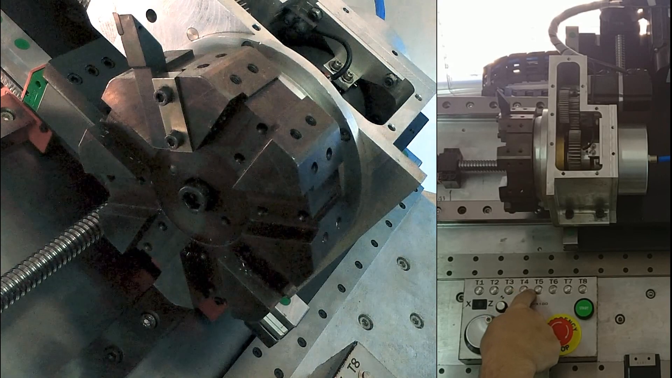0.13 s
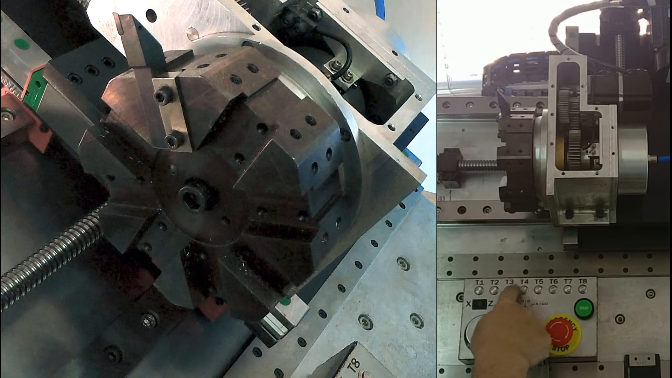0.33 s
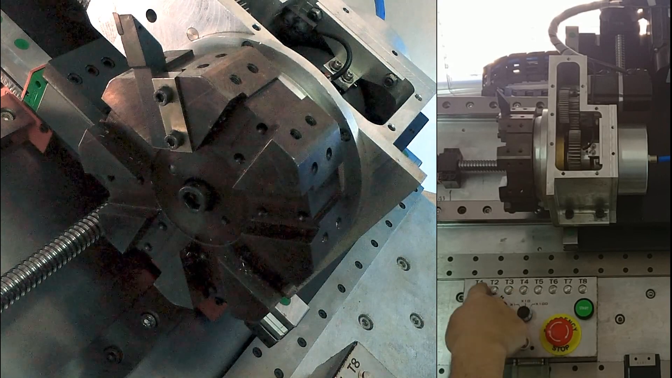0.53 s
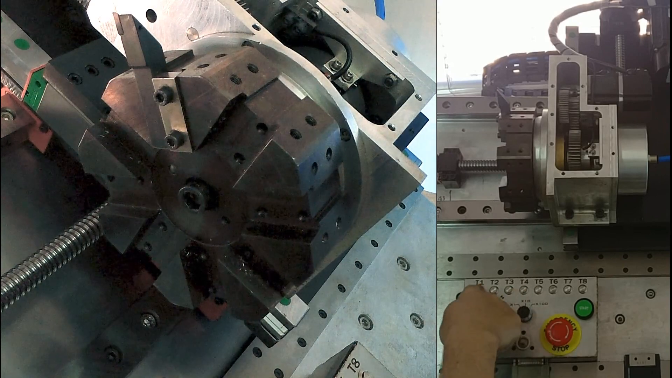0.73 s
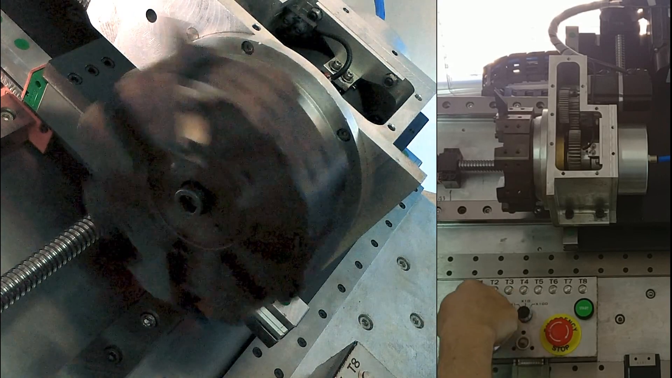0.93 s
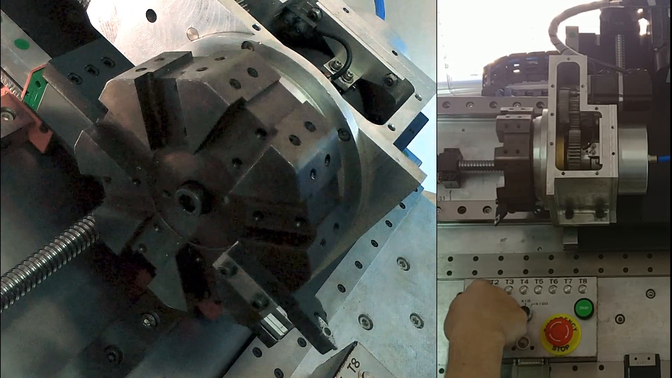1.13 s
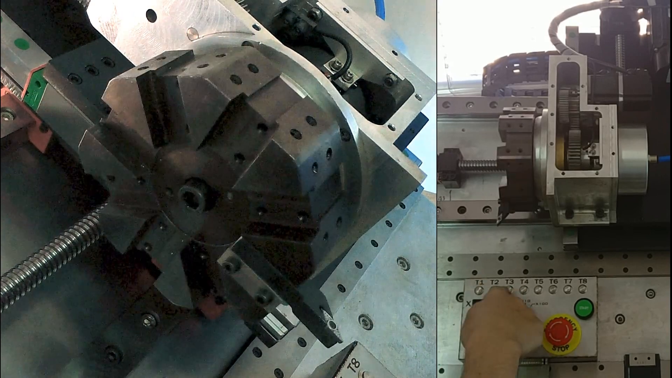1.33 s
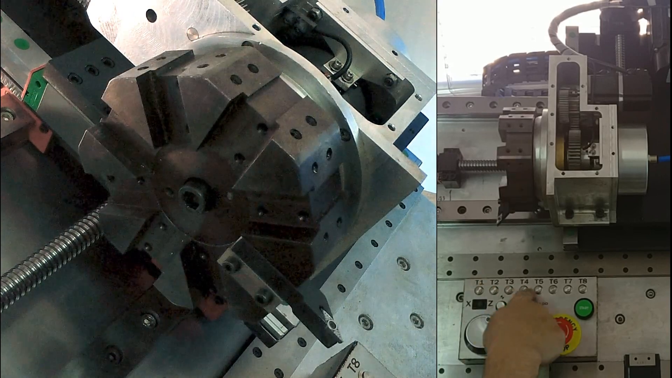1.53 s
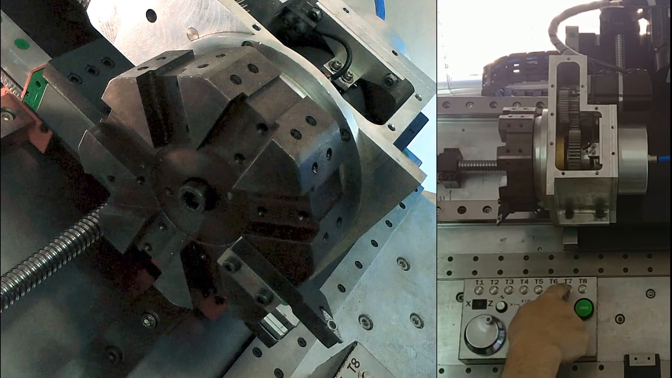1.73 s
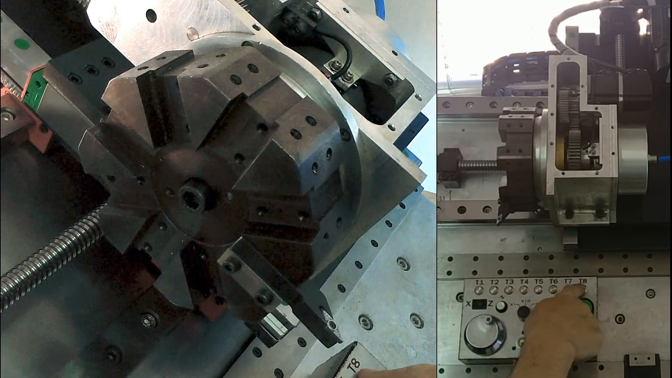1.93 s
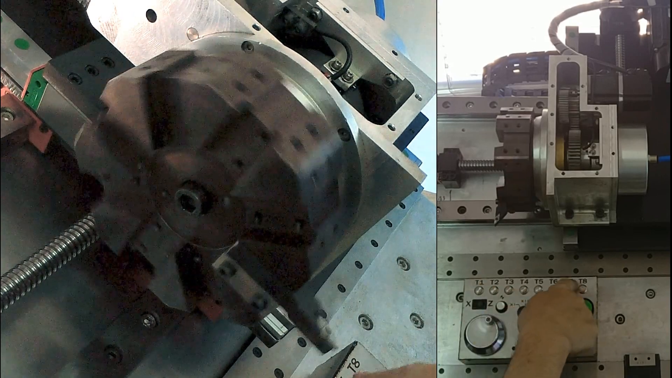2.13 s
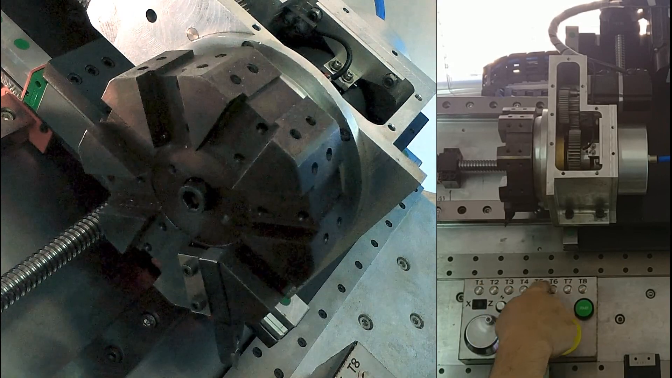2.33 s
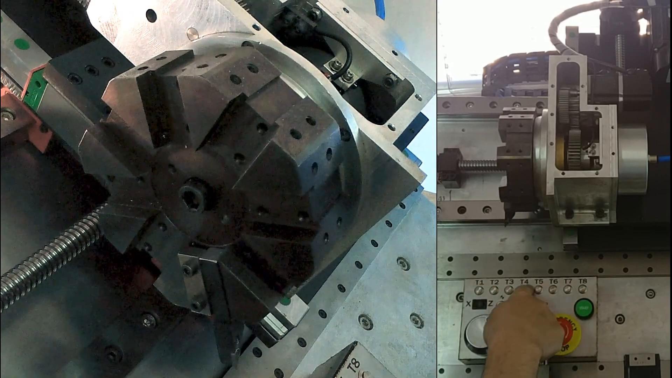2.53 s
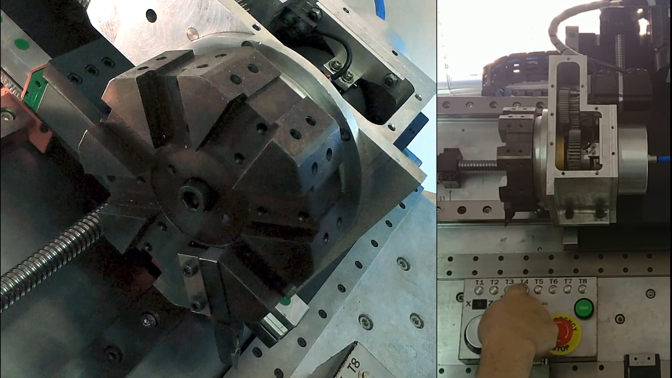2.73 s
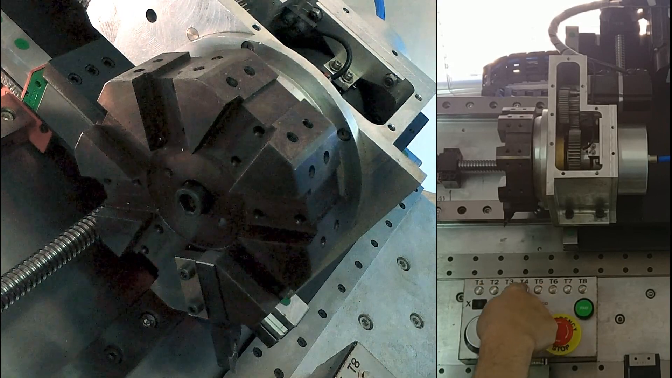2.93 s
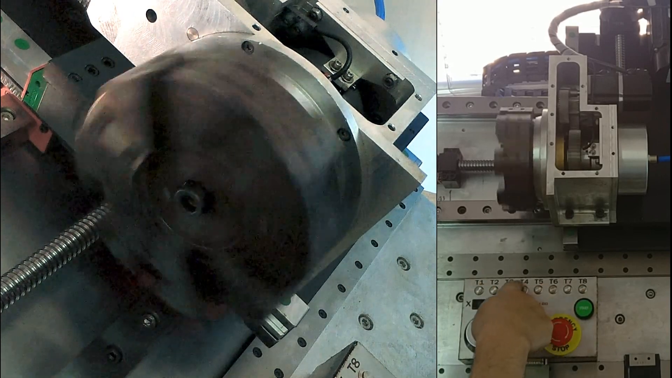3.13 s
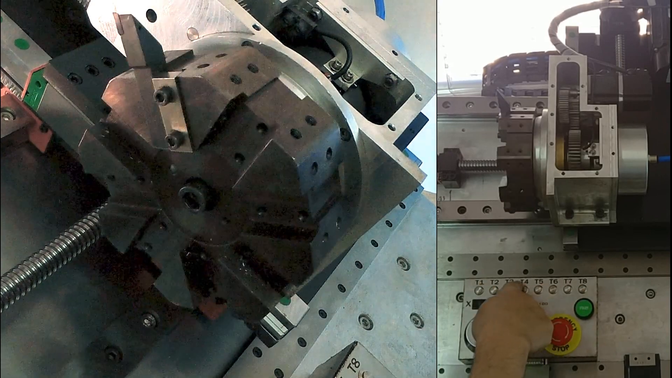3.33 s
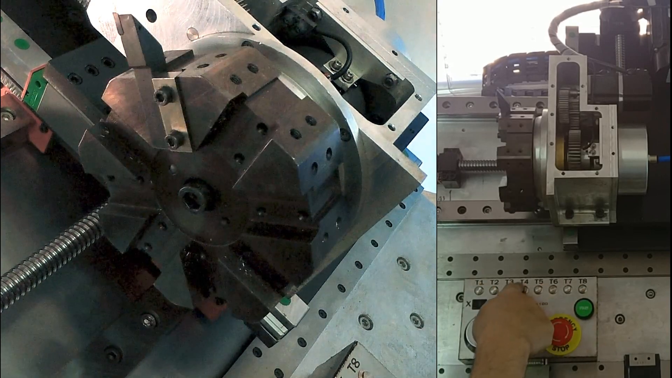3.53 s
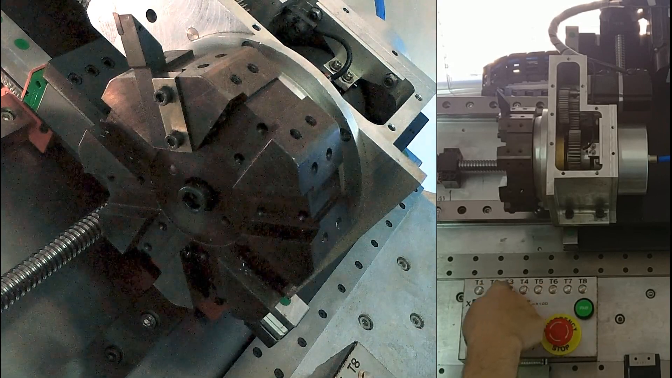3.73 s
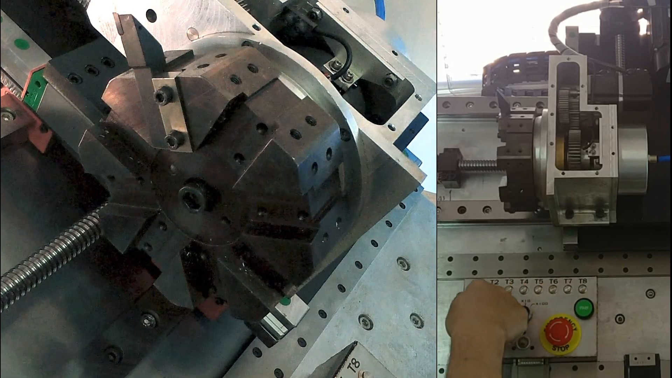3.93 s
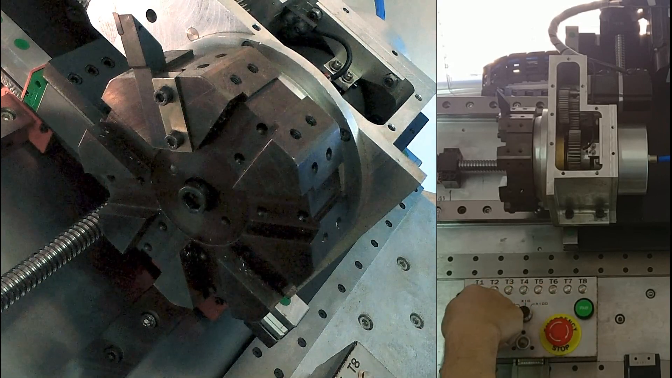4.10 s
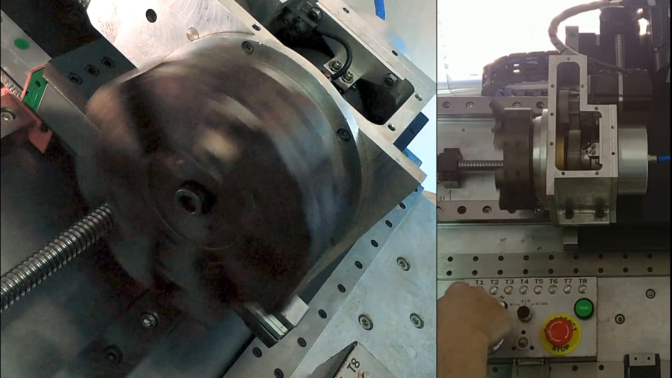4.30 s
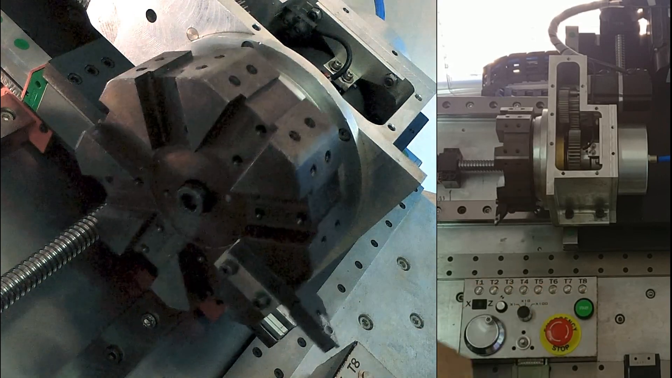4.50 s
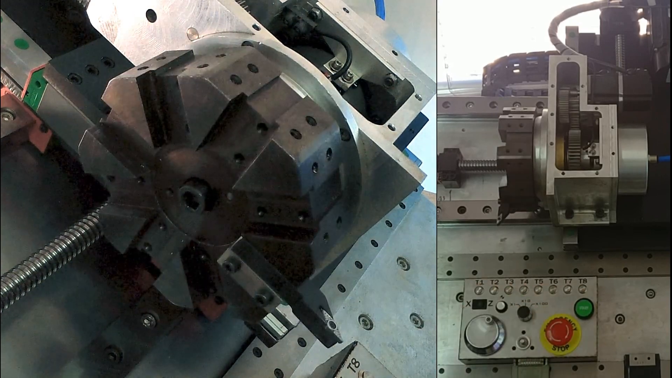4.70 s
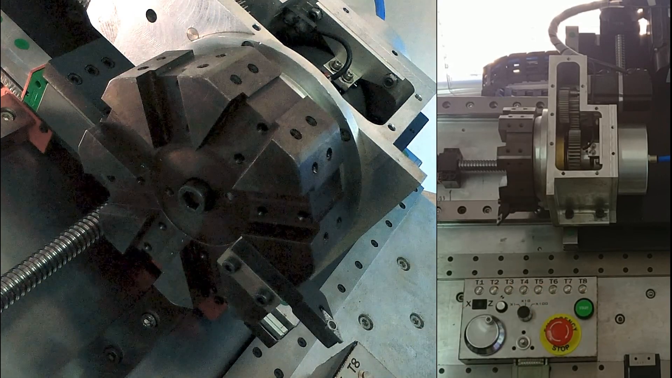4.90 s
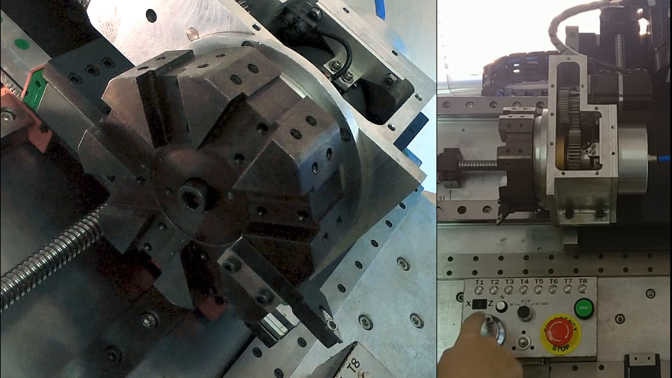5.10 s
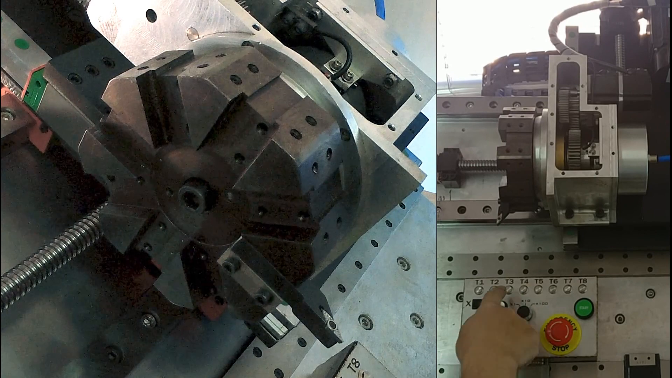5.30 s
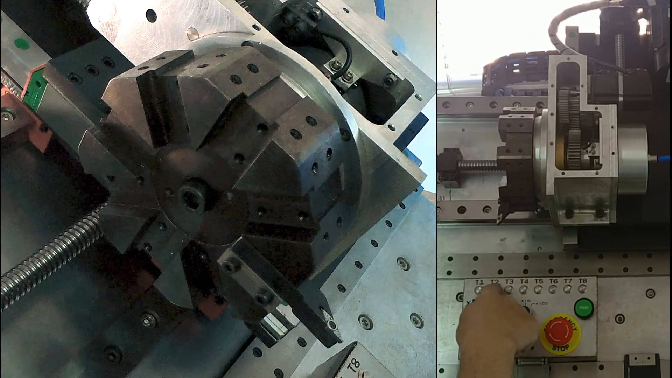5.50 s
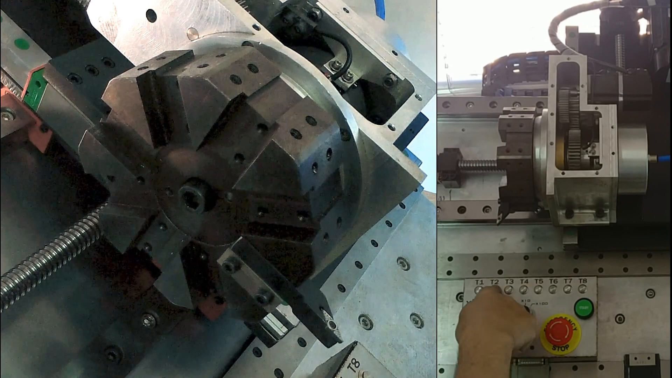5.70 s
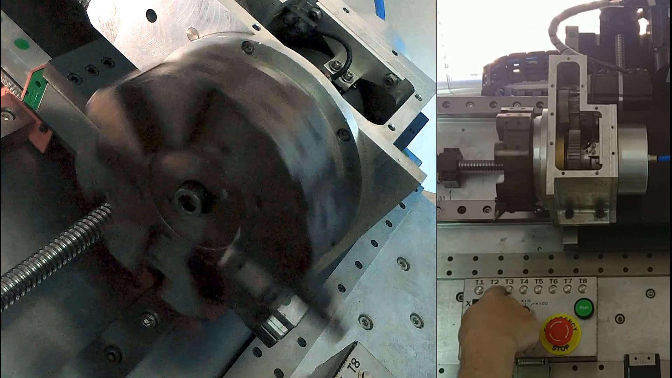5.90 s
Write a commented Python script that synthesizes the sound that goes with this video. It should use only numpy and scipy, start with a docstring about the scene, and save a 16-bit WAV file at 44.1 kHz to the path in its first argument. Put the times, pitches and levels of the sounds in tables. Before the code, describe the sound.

A pneumatic lathe turret indexes four times, each with a puff of air, a short metallic gear rattle and a hissing clunk.

```python
"""First comes a fading hiss of air: the pneumatic tool turret of a small lathe has just clamped.
Close to a stereo microphone in a workshop, it indexes four times and starts a fifth. Most cycles
open with a button click; a puff of air unclamps the turret, gear teeth rattle its body round,
and the clamp valve snaps and vents. The bench rocks under the jolts and the frame thuds.
Behind the machine, cabinet fans hum and servo drives whistle faintly."""
import sys
import numpy as np
from scipy import signal
from scipy.fft import rfft, irfft, next_fast_len
from scipy.io import wavfile

SR = 44100
rng = np.random.default_rng(int(sys.argv[2]) if len(sys.argv) > 2 else 0)


def transcribe(u):
    """Save the signal u as a 16-bit wav file named by the first command-line argument.

    u: samples, shape (n,) or (channels, n), limited to [-1, 1]; the rate is SR.
    q: integer samples, one column per channel.
    """
    v = np.clip(np.atleast_2d(u).T, -1, 1)
    q = np.round(v * 32767).astype(np.int16)
    wavfile.write(sys.argv[1], SR, q)


N = 262394

# valve shifts: (time [s], rise [s], blast level [dB], bleed over blast [dB], left over right [dB],
# top treble boost [dB], piston landing level [dB])
UNCLAMPS = [(0.8928, 0.0058, -10.5, -6.5, -2, 3, -14.5), (2.1163, 0.0049, -14, -4.5, -2.5, 8, -11),
            (2.9685, 0.0063, -9.5, -7.5, -1, 5.5, -13), (4.203, 0.013, -15.5, -2.5, -1, 4.5, -13),
            (5.8346, 0.0092, -6, -10, -4.5, 5, -14)]
CLAMPS = [(-.07, .0006, -10, -2.5, -1.3, 5, -11), (1.2573, 0.00054, -10, -3.5, 0.24, 2.7, -13.5),
          (2.3764, 0.00035, -11, -2, -0.42, 6.6, -18), (3.3727, 0.00053, -11, -2.5, -0.81, 8.9, -17.5),
          (4.5696, 0.00042, -9.5, -3.5, -1.8, 4.8, -14.5)]
# spectra of the exhaust, close up: (frequency [Hz], relative level [dB])
BLAST_COLOUR = [(88, -19.5), (150, -1.5), (1060, -13.5), (3060, -2), (3720, -18.5), (4100, 2),
                (4520, -22.5), (4890, -3.5), (6690, 0.5), (8630, 3.5), (9510, -3.5), (10500, 3),
                (13800, -9), (14900, -1), (16100, -11.5)]
BLEED_COLOUR = [(880, -10.5), (1640, -9), (2500, -11.5), (2980, -8), (3630, -11), (9070, 4), (11800, 0.5),
                (13900, -8), (15100, -6), (16100, -16)]
# valve body resonances in the blast, nozzle whistles in the bleed: (frequency [Hz], width [Hz], boost [dB])
VALVE_PEAKS = [(4853, 140, 8.5), (6100, 300, 5), (7900, 180, 2.5), (8640, 300, 7), (10200, 150, 8),
               (11060, 150, 6), (12250, 200, 8.5), (13100, 250, 8), (15300, 200, 6)]
NOZZLE_PEAKS = [(7310, 25, -24.5), (8000, 71, -12), (10000, 31, 6), (11300, 17, 9), (13000, 120, 7.5),
                (15580, 55, 12)]
# the air sits mostly left of the microphone: (frequency [Hz], left over right [dB])
AIR_PAN = [(60, 1), (150, 5.5), (380, 4), (950, 14), (2380, 3), (5980, 6.5), (15000, -3)]
# its stereo image: (frequency [Hz], left-right coherence [ratio])
AIR_COHERENCE = [(60, 0.74), (240, 0.41), (950, 0.24), (3770, -0.13), (15000, 0.2)]
# venting: (blast length [s], blast t60 [s], bleed t60 [s], empty after [s], leak lead [s],
# leak over blast [dB])
UNCLAMP_VENT = (0.0176, 0.0458, 0.3967, .3, 0.0164, -32.5)
CLAMP_VENT = (0.0208, 0.1792, 0.5849, 0.28, 0.0151, -16)
RUN_DRY_DB_PER_S = 148


def air():
    """Each valve leaks, blasts until it is emptied, then the line bleeds down and runs dry."""
    t = np.arange(N) / SR
    blast, sizzle, bleed = np.zeros((3, 2, N))
    for shifts, vent in ((UNCLAMPS, UNCLAMP_VENT), (CLAMPS, CLAMP_VENT)):
        length, t60, bleed_t60, empty, leak, leak_db = vent
        for s, rise, db, bleed_db, pan_db, top_db, _ in shifts:
            age = np.maximum(t - s, 0)
            opening = np.minimum(age / rise, 1) ** 2 * gain_of([[db + pan_db / 2], [db - pan_db / 2]])
            opening += gain_of(db + leak_db) * np.clip((t - s) / leak + 1, 0, 1) * (age < rise)
            jet = opening * gain_of(-60 * np.maximum(age - length, 0) / t60)
            blast += jet
            sizzle += jet * (gain_of(top_db) - 1)
            run_dry_db = RUN_DRY_DB_PER_S * np.maximum(age - empty, 0)
            bleed += opening * gain_of(bleed_db - 60 * age / bleed_t60 - run_dry_db)
    roar = unit_rms(hiss(BLAST_COLOUR, AIR_COHERENCE, AIR_PAN, VALVE_PEAKS) * flicker(db=1.7, hz=1200))
    top = signal.sosfiltfilt(signal.butter(2, 10500, "high", fs=SR, output="sos"), roar)
    nozzle = hiss(BLEED_COLOUR, AIR_COHERENCE, AIR_PAN, NOZZLE_PEAKS)
    return (blast * roar + sizzle * top + bleed * nozzle) * flicker(db=1.22, hz=150)


def valves():
    """A pressure pulse snaps as each clamp valve shifts; each unclamp spool seats with a bright ping."""
    seat_delay_s, seat_hz = 0.016, 11400
    out = np.zeros(N)
    age = np.arange(400) / SR / 0.00019  # in time constants of the pulse
    pulse = (1 - age) * np.exp(-age) * np.minimum(age / 0.77, 1)
    for s, *_ in CLAMPS:
        add(out, s, gain_of(6.5) * pulse)
    ping = np.sin(2 * np.pi * seat_hz * np.arange(SR // 2) / SR)
    for s, _, blast_db, *_ in UNCLAMPS:
        add(out, s + seat_delay_s, dying(blast_db + 3.5, t60=0.0068, rise=0.0003) * ping)
    return out


# modes of the turret body: (frequency [Hz], width [Hz], relative level [dB])
TURRET_MODES = [(348, 30, -5), (396, 21, 1.5), (447.8, 20.5, 4), (489, 42, 4), (500.3, 32, 3),
                (583, 37, 6.5), (697, 63, 6.5), (801, 28, 2), (964, 6.1, -4.5), (1068, 26, -3),
                (1110, 48, 7.5), (1254.6, 19.5, 5.5), (1236, 20, -0.5), (1295, 30, -3)]
# sliding faces: (frequency [Hz], relative level [dB])
GRIT_COLOUR = [(880, -23), (1500, -27), (1720, 4), (1890, 1.5), (2520, 3), (3260, -4.5), (4900, -6.5),
               (5900, -9.5), (6860, -28), (7890, -12.5), (11600, -12.5), (16100, -24)]
# ringing tool holders and a thin squeal on the grit: (frequency [Hz], width [Hz], boost [dB])
HOLDER_PEAKS = [(1654, 20, 15), (2437, 57, 8), (3070, 38, 10), (3620, 99, 7.5), (4640, 150, 9)]
SQUEAL_PEAK = [(15690, 50, 22)]
# the turret's image at the microphone: (frequency [Hz], left-right coherence [ratio])
TURRET_COHERENCE = [(60, 0.37), (240, 0.2), (950, 0.74), (3770, 0.13), (15000, 0.2)]
TEETH_PER_S, UPPER_MODES_FROM_HZ = 300, 950


def turret():
    """Uneven gear teeth and knocks rattle the modes of the turret body; its sliding faces add grit."""
    drive = turret_drive() * flicker(db=1.0, hz=122)
    strikes = gain_of(4 * rng.exponential(1, N)) * (rng.random(N) < TEETH_PER_S / SR)
    teeth = signal.oaconvolve(strikes, dying(0, t60=0.012, rise=0.00036)[:1000])[:N]
    lower, upper, grit = drive * unit_rms(1 + 0.22 * unit_rms(teeth))
    low_blows, high_blows, shaken_grit = gear_knocks()
    rattle = hiss(FLAT, TURRET_COHERENCE)
    body = np.zeros((2, N))
    for k, (hz, width, db) in enumerate(TURRET_MODES):
        effort, blows = (lower, low_blows) if hz < UPPER_MODES_FROM_HZ else (upper, high_blows)
        makeup = np.sqrt(SR / width / np.pi)  # narrow modes catch less of the rattle
        body += gain_of(db - 13.5) * makeup * resonate(rattle * effort + blows * (-1) ** k, hz, width)
    # the body is too small to radiate bass
    body = signal.sosfilt(signal.butter(3, 330, "high", fs=SR, output="sos"), body)
    scrape = hiss(GRIT_COLOUR, TURRET_COHERENCE, peaks=HOLDER_PEAKS + SQUEAL_PEAK)
    return body + (grit + shaken_grit) * scrape * flicker(db=1.0, hz=410)


# gear rattle, one list a turn: (time [s], lower modes [dB], upper over lower [dB], grit over lower [dB])
TURNS = [
    [(1.0, -45, -2, -35), (1.042, -23.5, 0, -15), (1.092, -13.5, 0, -4), (1.112, -25.5, 1, -3.5),
     (1.166, -16.5, -5, -8.5), (1.232, -34.5, -27, -50), (1.25, -33, -13, -21)],
    [(2.225, -48, 13, 8), (2.241, -42, -10, -15), (2.259, -33.5, 16, 2), (2.283, -24.5, 0, -2),
     (2.307, -19, -3, -4), (2.319, -25, -16, -8), (2.349, -40, 1, -3), (2.37, -37, -2, -8)],
    [(3.08, -51.5, 9.5, 4), (3.13, -18.5, 2, -11.5), (3.172, -16, -3, -5.5), (3.21, -27.5, 3.5, -0.5),
     (3.226, -15, 4, -3.5), (3.268, -23, -5, 1.5), (3.28, -14.5, -9, -23.5), (3.296, -24, 0.5, -43),
     (3.318, -25.5, -13, -15), (3.365, -43, -2, -12.5)],
    [(4.315, -47, -2, -5.5), (4.353, -26.5, 5.5, -7), (4.405, -13.5, -6.5, -6.5), (4.443, -24, -1, -2),
     (4.483, -19, 0, -6.5), (4.505, -30, 1, -9.5), (4.533, -29.5, -14.5, -18.5), (4.56, -41, -11, -9)],
]
# knocks as a piston lands: (delay [s], level over landing [dB], rise [s], t60 [s],
# upper over lower [dB], grit over lower [dB])
UNCLAMP_KNOCKS = [(0, -22, 0.0026, 0.12, -18, 1.5), (0.043, -22.5, 0.002, 0.089, -0.5, -4.5)]
CLAMP_KNOCKS = [(-0.0033, -11, 0.0069, 0.35, -7.5, -10)]


def turret_drive():
    """How hard turns and piston knocks drive the lower modes, upper modes and sliding faces."""
    t, drive = np.arange(N) / SR, np.zeros((3, N))
    for turn in TURNS:
        s, db, upper_db, grit_db = np.transpose(turn)
        turning = (t > s[0]) * (t < s[-1])
        drive += [gain_of(np.interp(t, s, db + over_db)) * turning for over_db in (0, upper_db, grit_db)]
    for s, db, knocks in landings(UNCLAMP_KNOCKS, CLAMP_KNOCKS):
        for delay, knock_db, rise, t60, upper_db, grit_db in knocks:
            add(drive, s + delay, gain_of([[0], [upper_db], [grit_db]]) * dying(db + knock_db, t60, rise))
    return drive


def landings(on_unclamp, on_clamp):
    """Each piston hits its stop just after its valve shifts: (time [s], level [dB], what it sets off)."""
    unclamp_travel_s, clamp_travel_s = 0.032, 0.031
    return ([(s + unclamp_travel_s, db, on_unclamp) for s, *_, db in UNCLAMPS]
            + [(s + clamp_travel_s, db, on_clamp) for s, *_, db in CLAMPS])


# the hardest gear knocks of the turns: (time [s], level [dB], upper over lower modes [dB])
GEAR_KNOCKS = [(1.063, 6, 5), (1.085, 8, -1), (1.094, 8, 1), (1.139, 6, -3), (1.162, 4, 1), (2.260, -4, 2),
               (2.292, 4.5, 1), (2.306, 5, -2), (3.119, 3, 7), (3.165, 10.5, 5), (3.174, 7, 0),
               (3.2185, 11, 5), (3.240, 7, 2), (3.274, 8.5, -4), (4.374, 2, 6), (4.393, 8, 0),
               (4.407, 7, -1), (4.480, 3, 1)]


def gear_knocks():
    """Single blows to the lower and upper modes, and the burst of grit that each one shakes loose."""
    blows, grit = np.zeros((2, N)), np.zeros(N)
    for s, db, upper_db in GEAR_KNOCKS:
        add(blows, s, gain_of([[db], [db + upper_db]]))
        add(grit, s, dying(db - 30, t60=0.031, rise=0.0005))
    return *blows, grit


# modes of the bench under the lathe: (frequency [Hz], relative level [dB], t60 [s],
# left over right [dB], left phase lead [rad])
BENCH_MODES = [(70.2, -3.5, 0.63, -9, 2.4), (96.4, 4.5, 0.3, -5, 0.89), (195.4, -0.5, 0.42, 6.5, 0.52),
               (257.6, -15, 0.46, 20.5, 1.1), (311, -8, 0.43, 4, 0.78)]
# jolts of the drive during a turn: (time [s], level [dB], frequency [Hz])
JOLTS = [(1.09, -22.5, 146), (1.143, -25, 119), (1.197, -22, 120.6), (2.27, -21.5, 121),
         (2.349, -29.5, 129), (3.169, -21.5, 140), (3.219, -22, 144), (3.27, -23, 144), (4.355, -22.5, 126),
         (4.409, -22.5, 138), (4.455, -25.5, 132), (4.519, -28.5, 101)]
# swings of the bench after a landing: (level over landing [dB], frequency [Hz])
UNCLAMP_SWINGS = [(-6.5, 127), (-6.5, 124)]
CLAMP_SWINGS = [(-11.5, 132), (-13.5, 139.3), (-18.5, 136.6), (-25, 130)]
# when each swing starts: (delay after landing [s])
UNCLAMP_DELAYS = (0, .074)
CLAMP_DELAYS = (0, .045, .135, .225)


def bench():
    """The bench rocks on a low note at every jolt, and rings and rocks back when a piston lands."""
    t = np.arange(SR) / SR
    rocking, ringing = np.zeros((2, 2, N))
    ring = np.zeros((2, SR))
    for hz, db, t60, pan_db, lead in BENCH_MODES:
        decay = gain_of(db - 17 - 60 * t / t60 + np.array([[pan_db], [-pan_db]]) / 2)
        ring += decay * np.sin(2 * np.pi * hz * t + [[lead], [0]])
    jolts = list(JOLTS)
    for s, db, rock in landings((UNCLAMP_DELAYS, UNCLAMP_SWINGS), (CLAMP_DELAYS, CLAMP_SWINGS)):
        add(ringing, s, gain_of(db) * ring * np.minimum(t / 0.0025, 1))
        for delay, (swing_db, hz) in zip(*rock):
            jolts.append((s + delay, db + swing_db, hz * rng.normal(1, 0.04)))
    for s, db, hz in jolts:
        note = np.sin(2 * np.pi * hz * t[:SR // 2] + [[0.9], [0]])
        add(rocking, s, dying(db, t60=0.18, rise=0.019) * note)
    return rocking * gain_of([[-1.5], [2.2]]) + ringing


# low thuds, a little left of the microphone: (time [s], level [dB], starting frequency [Hz])
THUDS = [(-.03, -30.5, 230), (1.295, -23.5, 207), (1.33, -28.5, 250), (2.405, -26, 203),
         (2.448, -25.5, 250), (3.01, -27.5, 205), (3.42, -31.5, 203)]
# modes of the frame: (frequency [Hz], level over thud [dB], t60 [s])
FRAME_MODES = [(220, -12.5, 1.0), (241, -16.5, 0.86)]


def thuds():
    """The turret settles on its coupling: each thud sags in pitch and leaves the frame ringing."""
    sag_per_s, rise_s = 3.8, 0.014
    t, out = np.arange(SR // 2) / SR, np.zeros(N)
    ring = sum(dying(db, t60, rise_s) * np.sin(2 * np.pi * hz * t) for hz, db, t60 in FRAME_MODES)
    for s, db, hz in THUDS:
        sagging = np.sin(2 * np.pi * hz * (1 - np.exp(-sag_per_s * t)) / sag_per_s)
        add(out, s, gain_of(db) * (dying(0, t60=0.13, rise=rise_s) * sagging + ring))
    return out * gain_of([[1.5], [-1.5]])


# button presses at the machine: (time [s], relative level [dB], t60 [s])
CLICKS = [(0.7971, -31.5, 0.091), (2.005, -45.5, 0.13), (4.1157, -49.5, 0.11), (5.746, -45, 0.092)]
# their spectrum: (frequency [Hz], relative level [dB])
CLICK_COLOUR = [(1470, -28), (2500, -8), (2990, -55), (4110, -4), (5690, -14), (6760, -8), (9220, 4),
                (16000, -16)]


def button():
    """The push button gives a small bright click with a short rattle."""
    envelope = np.zeros(N)
    for s, db, t60 in CLICKS:
        add(envelope, s, dying(db + 0.5, t60, rise=0.00043))
    return envelope * hiss(CLICK_COLOUR, SHOP_COHERENCE)


# room tone of the workshop: (frequency [Hz], relative level [dB])
SHOP_COLOUR = [(15, -57.5), (25, -45), (49, -6.5), (212, -12), (271, -14), (562, -8.5), (644, -10),
               (844, -6.5), (941, -10), (1410, -18.5), (1620, -12), (2360, -11.5), (3710, -27.5),
               (4770, -29), (9300, -27.5), (10300, -24), (11400, -32.5), (16100, -50)]
# a broad hump in its treble: (frequency [Hz], width [Hz], boost [dB])
SHOP_HUMP = [(7960, 880, 5)]
# the room's image at the microphone: (frequency [Hz], left-right coherence [ratio])
SHOP_COHERENCE = [(60, 0.38), (150, 0.2), (380, 0.76), (950, 0.4), (2380, 0.019), (5980, 0.06),
                  (15000, 0.98)]


def room_tone():
    """A steady wash of workshop noise around the microphone."""
    return gain_of(-47.5) * hiss(SHOP_COLOUR, SHOP_COHERENCE, peaks=SHOP_HUMP)


# cabinet fans, centred in the background: (frequency [Hz], width [Hz], level [dB])
FAN_TONES = [(685, 4.1, -59), (841, 13, -56), (1340, 7.2, -66)]


def fans():
    """Each fan hums a steady tone, blurred by a narrow band of noise."""
    t, out = np.arange(N) / SR, np.zeros(N)
    for hz, width, db in FAN_TONES:
        fuzz = unit_rms(resonate(rng.standard_normal(N), hz, width))
        out += gain_of(db) * unit_rms(fuzz + 1.8 * np.sin(2 * np.pi * hz * t))
    return out


# whistling while the turret rests: (start [s], end [s], low note level [dB], high note level [dB])
SERVO_RESTS = [(0, 0.9, -65.5, -78), (1.25, 2.12, -82, -69), (2.38, 2.975, -67, -78),
               (3.37, 4.21, -74.5, -69), (4.57, 5.84, -73, -74)]
# the low and the high note: (frequency [Hz])
SERVO_HZ = np.array([[8000], [10002]])


def servos():
    """The drives whistle on two notes, their strength set by where the turret rests."""
    t = np.arange(N) / SR
    levels = sum((t > start) * (t < end) * gain_of([[low_db], [high_db]])
                 for start, end, low_db, high_db in SERVO_RESTS)
    notes = np.sqrt(2) * np.sin(2 * np.pi * SERVO_HZ * t)
    return (levels * notes).sum(axis=0) * flicker(db=1.5, hz=8)


def reflections(x, t60):
    """The workshop returns sparse, dying echoes of random sign, different in each channel."""
    taps = np.zeros((2, SR // 2))
    at = np.arange(300, SR // 2 - 20, 20) + rng.integers(0, 20, (2, (SR // 2 - 301) // 20))
    np.put_along_axis(taps, at, rng.choice([-1., 1.], at.shape), 1)
    taps *= gain_of(-60 * np.arange(SR // 2) / SR / t60)
    return signal.fftconvolve(x, taps / np.linalg.norm(taps[0]), axes=1)[:, :N]


FLAT = ((20, 0), (20000, 0))  # an even spectrum or balance: (frequency [Hz], level [dB])


def hiss(colour, coherence, pan=FLAT, peaks=()):
    """Steady stereo noise of a given spectrum, left-right coherence and balance, rms 1."""
    size = next_fast_len(N)
    hz = np.fft.rfftfreq(size, 1 / SR)
    left, other = rfft(rng.standard_normal((2, size)))
    alike = np.sqrt(np.clip(curve_at(coherence, hz), 0, 1))
    pair = np.array([left, alike * left + np.sqrt(1 - alike ** 2) * other])
    peaks_db = sum(boost / (1 + (2 * (hz - centre) / width) ** 2) for centre, width, boost in peaks)
    db = curve_at(colour, hz) + peaks_db + np.outer([0.5, -0.5], curve_at(pan, hz))
    return unit_rms(irfft(pair * gain_of(db), size)[:, :N])


def curve_at(points, hz):
    """Interpolates a curve on a log-frequency axis."""
    point_hz, value = np.transpose(points)
    return np.interp(np.log(hz + 1), np.log(point_hz + 1), value)


def resonate(x, hz, width):
    """A resonance with a peak gain of 1."""
    return signal.lfilter(*signal.iirpeak(hz, hz / width, fs=SR), x)


def flicker(db, hz):
    """Gain that wanders by db at rates up to hz."""
    return gain_of(db * unit_rms(signal.lfilter(*signal.butter(2, hz, fs=SR), rng.standard_normal(N))))


def dying(db, t60, rise):
    """Envelope of one blow: it swells over the rise, then decays steadily."""
    age = np.arange(SR // 2) / SR
    return gain_of(db - 60 * np.maximum(age - rise, 0) / t60) * np.minimum(age / rise, 1) ** 1.5


def add(mix, s, sound):
    """Mixes a sound in from time s, which may lie before the start."""
    at = round(s * SR)
    sound = sound[..., max(-at, 0):]
    part = mix[..., max(at, 0):][..., :sound.shape[-1]]
    part += sound[..., :part.shape[-1]]


def gain_of(db):
    """Decibels to amplitude."""
    return 10 ** (np.asarray(db) / 20)


def unit_rms(x):
    """Scales to rms 1."""
    return x / np.sqrt(np.mean(x ** 2) + 1e-20)


def scene():
    """The lathe close up, faint reflections of its metal sounds, and the workshop behind."""
    metal = turret() + valves()
    machine = air() + metal + gain_of(-16.5) * reflections(metal, t60=0.35) + bench() + thuds() + button()
    return machine + room_tone() + fans() + servos()


def record(dry):
    """At the close microphone the loudest peaks overload softly; the highest treble is cut off."""
    ceiling, cutoff_hz = 1.15, 15880
    bent = ceiling * np.tanh(dry / ceiling)
    lowpass = signal.firwin(511, cutoff_hz, window=("kaiser", 9), fs=SR)
    return signal.oaconvolve(bent, lowpass[None], "same")


dry = scene()
out = record(dry)
transcribe(out)
```